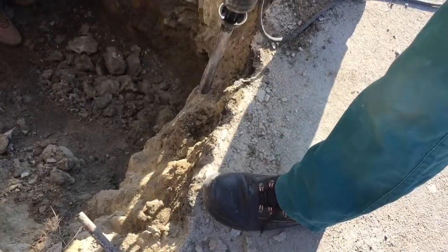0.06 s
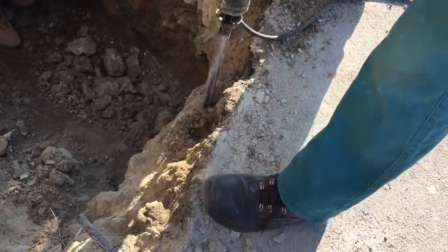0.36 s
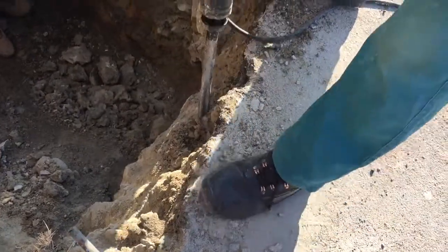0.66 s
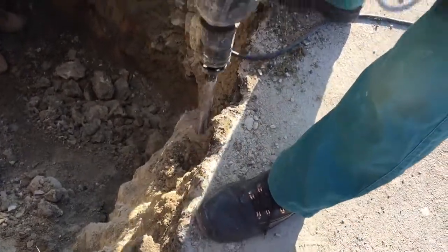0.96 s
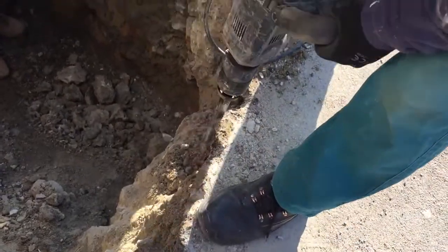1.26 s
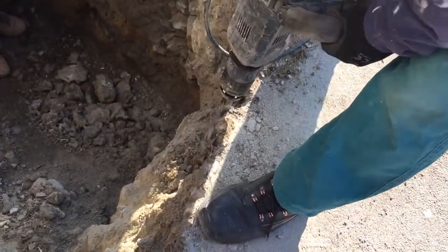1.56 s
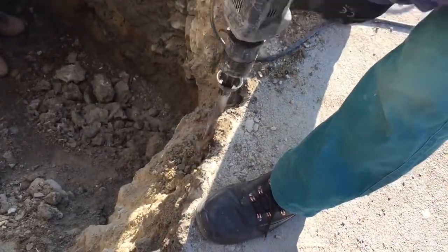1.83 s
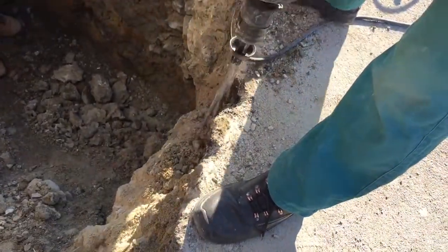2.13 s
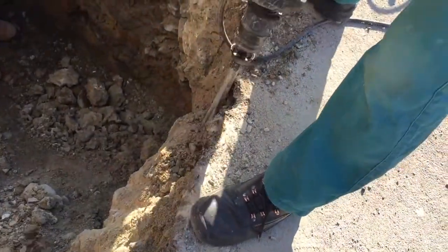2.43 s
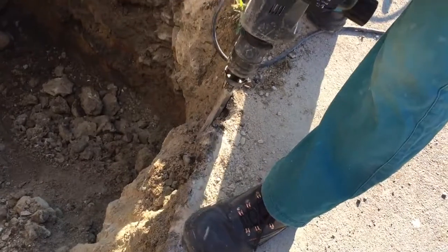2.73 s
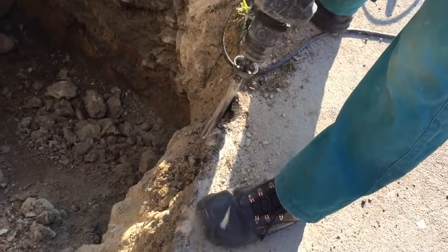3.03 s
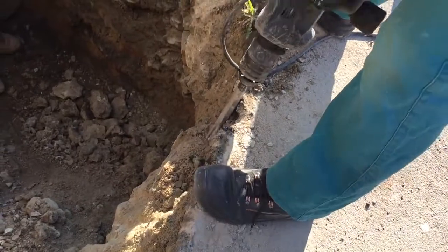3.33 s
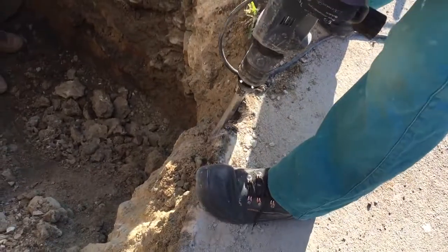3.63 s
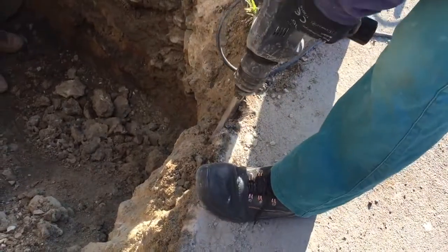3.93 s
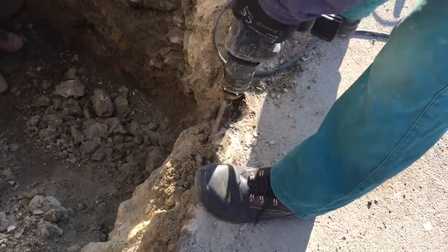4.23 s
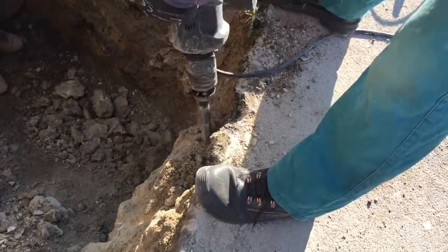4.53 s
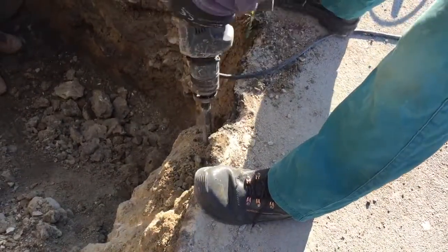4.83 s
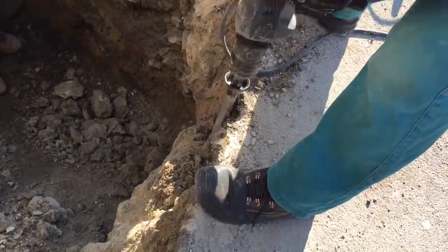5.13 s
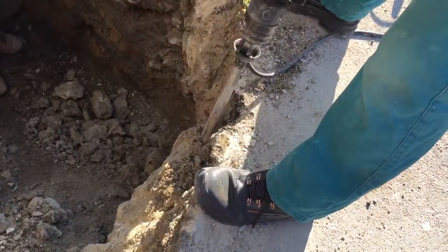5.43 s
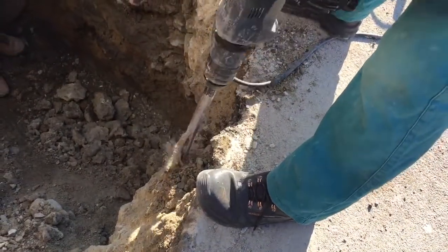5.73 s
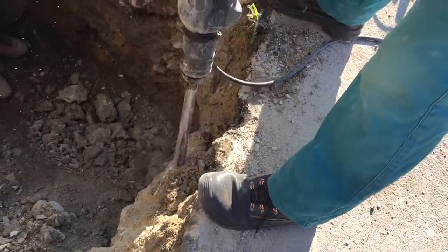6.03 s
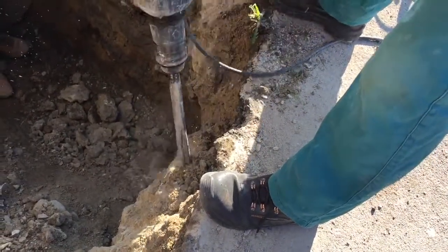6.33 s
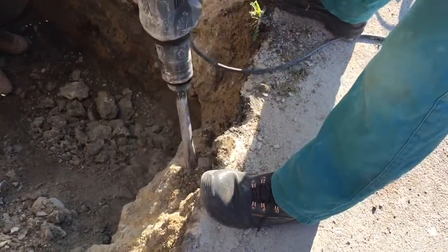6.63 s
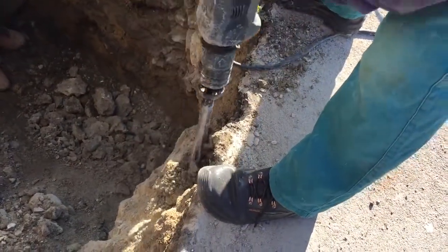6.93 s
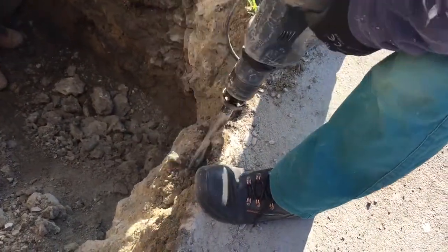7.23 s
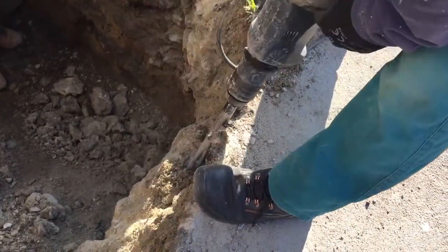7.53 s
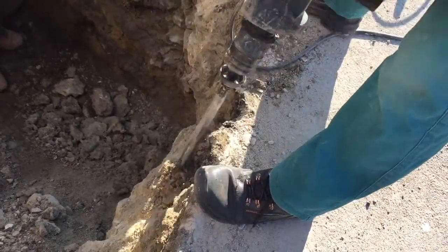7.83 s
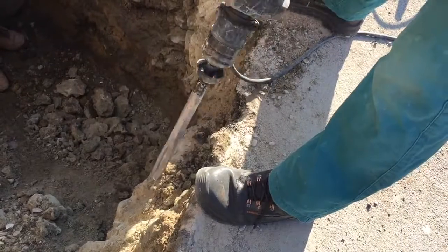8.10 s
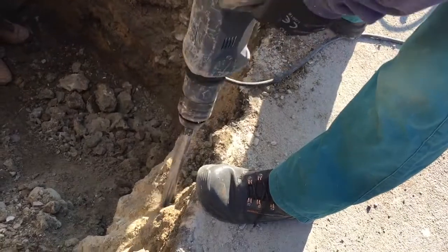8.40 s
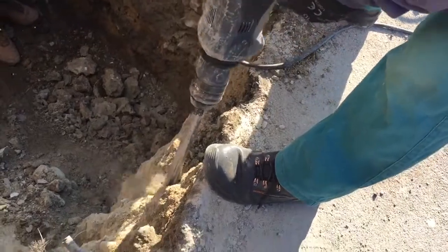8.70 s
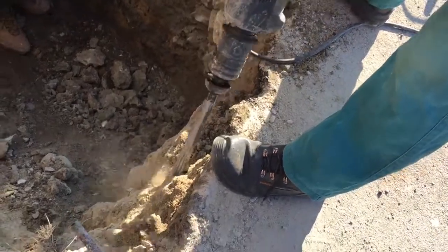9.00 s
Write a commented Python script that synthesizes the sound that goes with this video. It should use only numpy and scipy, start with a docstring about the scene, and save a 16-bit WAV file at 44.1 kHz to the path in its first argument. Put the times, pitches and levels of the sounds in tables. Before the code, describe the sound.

Close rattling bursts of an electric breaker chiselling stony ground, with crunching grit, a surging motor whine and a faint generator hum.

```python
"""An electric breaker chisels at the stony edge of a pit, about a metre from the microphone.
First its motor whines freely while a generator hums further off. From 0.4 s it is pressed down nine
times: the motor sags and the ram strikes some 32 times a second. Each blow cracks on the steel, knocks
the stone and thuds in the ground; then grit crunches and a loose chisel rings on. After each press the
motor surges and begins to settle. The last press runs until the sound ends, just after 9 s."""
import sys
import numpy as np
from scipy import signal
from scipy.fft import rfft, irfft
from scipy.io import wavfile
from scipy.ndimage import uniform_filter1d

SR = 44100
rng = np.random.default_rng(int(sys.argv[2]) if len(sys.argv) > 2 else 0)


def persist_wave(psi):
    """Save psi, clipped to +-1, as 16-bit WAV."""
    counts = np.round(np.clip(psi, -1, 1) * 32767).astype(np.int16)
    wavfile.write(sys.argv[1], SR, np.atleast_2d(counts).T)


N = 403956
T = np.arange(N) / SR


def undb(db):
    """Turn decibels into a factor to multiply by."""
    return 10 ** (np.asarray(db) / 20)


def unit(x):
    """Scale a signal to an average size (rms) of 1."""
    return x / np.sqrt(np.mean(x ** 2))


def curves(table, at):
    """Read a table's columns at the given times, drawing straight lines between its rows."""
    times, *columns = np.transpose(table)
    return [np.interp(at, times, column) for column in columns]


def colour(x, points):
    """Shape the tone with (f/Hz, level/dB) points; white noise keeps its overall level."""
    hz, db = np.transpose(points)
    gain = undb(np.interp(np.log(np.fft.rfftfreq(4096, 1 / SR) + 1), np.log(hz), db))
    # fold the filter so that nothing sounds before its cause
    cepstrum = irfft(np.log(gain))
    half = len(cepstrum) // 2
    cepstrum[1:half] *= 2
    cepstrum[half:] = 0
    response = irfft(np.exp(rfft(cepstrum)))
    return signal.fftconvolve(x, response / np.linalg.norm(response))[:len(x)]


def wander(rate_hz):
    """A smooth random wobble of about size 1."""
    hold = max(int(SR / rate_hz), 1)
    steps = np.repeat(rng.standard_normal(N // hold + 1), hold)
    return unit(uniform_filter1d(steps, hold)[:N])


def last_blow(times):
    """For each sample: which blow came last, and how many seconds ago."""
    latest = np.maximum(np.searchsorted(times, T) - 1, 0)
    return latest, np.where(T > times[0], T - times[latest], 1)


def place(times, db, shapes):
    """Put one sound at each time; db is the level that 32 of them a second would have."""
    out = np.zeros(N + SR)
    for start_s, gain, shape in zip(times, undb(db), shapes):
        i = int(start_s * SR)
        out[i:i + len(shape)] += gain * shape * np.sqrt(SR / 32) / np.linalg.norm(shape)
    return out[:N]


def strike(times, db, tones, lag_s, scatter, uneven_db):
    """A struck thing's tones, a little different each time; each drops 60 dB in its fade time."""
    longest_s = max(fade_s for _, _, fade_s in tones)
    t = np.arange(min(int(SR * longest_s), SR // 4)) / SR
    shapes = 0
    for k, (hz, tone_db, fade_s) in enumerate(tones):
        detune, size = rng.standard_normal((len(times), 2)).T[:, :, None]
        swing = np.sin(2 * np.pi * hz * (1 + scatter * detune) * t)
        fade = np.exp(-np.log(1000) * t / fade_s)
        shapes = shapes + (-1) ** k * undb(tone_db + uneven_db * size) * swing * fade
    return place(times + lag_s, db, shapes)


# how fast the generator fires and how loud it is: t/s, f/Hz, level/dB
GENERATOR_RUN = [(0, 52, -39.5), (.35, 52, -42), (2.1, 53, -48), (2.3, 53, -56), (3.2, 53.5, -47),
                 (4.9, 53.5, -52), (5.6, 53.5, -44.5), (6.1, 53.5, -57), (9.16, 53.5, -56)]
# the tones of its hum: multiple of the firing rate, level/dB
HUM_TONES = [(1, -3), (2, 0.5), (3, -12), (4, -3), (5, -3)]
def generator():
    """A small engine's exhaust hums further off, wavering a little."""
    hz, db = curves(GENERATOR_RUN, T)
    phase = 2 * np.pi * np.cumsum(hz * (1 + 0.0071 * wander(12))) / SR
    tones = (undb(db + tone_db + 2 * wander(9.8)) * np.sin(k * phase) for k, tone_db in HUM_TONES)
    return np.sqrt(2) * sum(tones)


# the tone of the rushing air: f/Hz, level/dB
AIR_TONE = [(30, -19), (140, -10.5), (250, -4), (400, -12.5), (650, -7.5), (930, -2.5), (1180, -7.5),
            (1550, -2), (2400, -13), (4200, -12), (4850, -17.5), (5800, -17.5), (8600, -24.5),
            (16000, -39.5)]
def cooling_air(hammering):
    """Air rushes through the motor, a little quieter while the ram strikes."""
    rush = colour(rng.standard_normal(N), AIR_TONE)
    return rush * undb(-30 - 1.5 * hammering + 0.6 * wander(50))


# the gears' tones: multiple of the shaft speed, free level/dB, loaded level/dB
GEAR_TONES = [(4, -40, -49), (8, -50, -36), (12, -52, -57), (17, -59, -49)]
def gears(angle, load):
    """The gears sing; load changes which of their tones stand out."""
    out = 0
    for k, free_db, loaded_db in GEAR_TONES:
        db = free_db + (loaded_db - free_db) * load + (1.5 + 2 * load) * wander(90)
        out = out + undb(db) * np.sin(k * angle)
    return np.sqrt(2) * out


# how loud the fan is as the tool turns: t/s, level/dB
FAN_LEVEL = [(0, -42.5), (.35, -42.5), (.6, -43), (1.0, -39), (1.5, -41), (1.8, -45), (2.0, -41),
             (2.28, -40), (2.4, -48), (4.25, -43), (4.7, -45.5), (5.0, -38.5), (5.3, -44.5), (5.7, -47.5),
             (7.9, -41.5), (8.1, -41), (9.16, -49)]
# the whine's tones: multiple of the shaft speed, added level/dB, slow wobble/dB
WHINE_TONES = [(8.93, 8, 2.5), (17.9, 1, 3.5), (27, -11, 2), (36, -12, 1), (45, -36, 3)]
def fan_whine(angle, load):
    """The fan's whine follows the shaft speed and gets quieter under load."""
    fan_db, = curves(FAN_LEVEL, T)
    # the piston loads the shaft twice for each turn of the crank, so the whine flutters
    flutter = 1 + .5 * np.sin(2 * angle / TURNS_PER_BLOW + .7 * wander(25))
    waver = undb(1.8 * wander(110))
    tones = sum(undb(fan_db + db + wobble_db * wander(6)) * np.sin(k * angle)
                for k, db, wobble_db in WHINE_TONES)
    return np.sqrt(2) * tones * flutter * waver * undb(-7 * load)


def coast(age, from_hz, surge_hz, free_hz=305.2, rise_s=.07, settle_s=.25):
    """Let go, the motor speeds up too far and its speed control reins it in."""
    settle, rise = (np.exp(-np.maximum(age, 0) / s) for s in (settle_s, rise_s))
    return free_hz + (from_hz - free_hz) * settle + surge_hz * (settle - rise)


def shaft_speed(lean_s=0.0692):
    """Turns a second: leaning on the tool drags the motor down, and it coasts in between."""
    t = T[::100]
    hz = coast(t + .12, from_hz=305.2, surge_hz=80)  # the tool has only just been lifted
    for press, (*_, surge_hz) in zip(PRESSES, PRESS_SPOTS):
        start, end = press[0][0], press[-1][0]
        working_hz = curves(press, t)[0]
        pressed = np.clip(1 + (t - start) / lean_s, 0, 1)
        released_hz = coast(t - end, working_hz[-1], surge_hz)
        hz = np.where(t < end, hz + pressed * (working_hz - hz), released_hz)
    return np.interp(T, t, hz)


def motor(times):
    """One shaft drives the fan and the gears, while cooling air rushes."""
    hz = shaft_speed()
    _, age = last_blow(times)
    hammering = uniform_filter1d(1. * (age < .05), SR // 20)
    load = hammering * np.clip((326 - hz) / 30, 0, 1)  # the harder it works, the slower it turns
    stumble = 0.0108 * load * np.cos(2 * np.pi * 32 * age)  # the shaft trips at each blow and recovers
    jitter = (.0012 + 0.0084 * load) * wander(130)
    angle = 2 * np.pi * np.cumsum(hz * (1 + stumble + jitter)) / SR
    return fan_whine(angle, load) + gears(angle, load) + cooling_air(hammering)


def grit(times, db, crumbs_per_s=5000, fade_s=0.014):
    """Crumbs of stone crunch after each blow."""
    latest, age = last_blow(times)
    crumbs = (rng.random(N) < crumbs_per_s / SR) * rng.standard_normal(N)
    crumbs *= undb(2.7 * rng.exponential(size=N))  # a few are much louder
    crunch = colour(unit(crumbs), [(150, -3.5), (300, 10.0), (450, -6.5), (1000, 1), (1600, -3.5),
                                   (2200, 1.5), (4000, -8.5), (8000, -6.5), (15000, -22)])
    return crunch * undb(db[latest] + 9) * np.exp(-age / fade_s)


# the low tones of ground and housing under a blow: f/Hz, level/dB, fade time/s
GROUND_TONES = [(69.2, -7, 0.14), (134.8, -3, 0.13), (211, -1, 0.09), (272.3, 2.5, 0.086)]
# the tip sinks in and a clod of earth gives way: t/s, level/dB
CLOD_THUDS = [(.977, -23), (1.009, -24), (2.836, -28), (5.944, -27), (6.350, -22), (7.275, -28),
              (8.633, -23.5)]
def ground(times, boom_db, thud_db, uneven):
    """The ground booms and thuds at every blow, with a heavy thud when a clod gives way."""
    boom = strike(times, boom_db, GROUND_TONES[:1], lag_s=0.0012, scatter=.015, uneven_db=1)
    thud = strike(times, thud_db, GROUND_TONES[1:],
                  lag_s=0.0018, scatter=.015 * uneven, uneven_db=2.5 * uneven)
    clods = strike(*np.transpose(CLOD_THUDS), GROUND_TONES[2:], lag_s=0.0029, scatter=.06, uneven_db=2.5)
    return boom - thud + clods


# the stone's tones: f/Hz, level/dB, fade time/s
STONE_TONES = [(384, -16.5, 0.07), (545.5, -3, 0.086), (637, 2.5, 0.039), (747, -1, 0.016)]
def stone_knock(times, db, uneven):
    """The stone gives a short knock as the tip bites."""
    return undb(-1) * strike(times, db, STONE_TONES,
                             lag_s=0.00086, scatter=0.019 * uneven, uneven_db=3.4 * uneven)


# the tones of the tool's housing: f/Hz, level/dB, fade time/s
HOUSING_TONES = [(1562, -1, 0.086), (2910, 3.5, 0.034), (3104, -10, 0.029), (4630, 0, 0.031),
                 (5230, -3.5, 0.083), (6700, 5, 0.02), (6940, 14.5, 0.015), (8650, 3.5, 0.03)]
def housing_clank(times, db, uneven):
    """The housing clanks when the chisel sits hard on the stone."""
    return undb(2) * strike(times, db, HOUSING_TONES,
                            lag_s=0.001103, scatter=0.015 * uneven, uneven_db=4.64 * uneven)


# glancing hits on the chisel's shank, its long stem: t/s, level/dB
GLANCES = [(2.393, -33), (2.425, -27), (2.457, -29.5), (6.280, -23), (6.314, -25), (6.625, -29),
           (6.689, -30), (8.758, -29), (8.951, -28), (8.984, -23)]
# the tones of the bending shank: f/Hz, level/dB, fade time/s
SHANK_TONES = [(1900, 4, .05), (3750, -3, 0.13), (3670, 1, 0.093), (5360, -7, .06)]
def shank_clangs():
    """The shank glances off stone, bends to and fro, and clangs."""
    return strike(*np.transpose(GLANCES), SHANK_TONES, lag_s=.0005, scatter=.006, uneven_db=2)


# the tip breaks through: t/s, level/dB, wait for the second clack/s
BREAKTHROUGHS = [(0.477, -26.5, 0.0052), (1.875, -28, 0.0052), (2.522, -21.5, 0.0059), (2.904, -24, .005),
                 (5.943, -28, 0.007), (6.383, -28, 0.0082), (8.632, -26, 0.006)]
def striker_clacks(ring_s=0.0016, second_db=-3):
    """The steel striker hits its catcher twice, with two bright, dry clicks."""
    t = np.arange(SR // 30) / SR
    times, db, gaps = np.transpose(BREAKTHROUGHS)
    late = t - gaps[:, None]
    envelope = np.exp(-t / ring_s) + undb(second_db) * (late > 0) * np.exp(-np.abs(late) / ring_s)
    clicks = place(times, db, envelope * rng.standard_normal(envelope.shape))
    return colour(clicks, [(1000, -16), (4500, -21), (8500, 11), (12000, 11), (15500, -27)])


# the chisel's tones: f/Hz, level/dB, fade time when loose/s, jolt per blow/rad, share of the swell in dB
CHISEL_TONES = [(3645, -14, .07, 2.5, .9), (5790, -8, .07, 2.5, .9), (6914, 1.3, .19, 1.2, 1),
                (8274, -7, .045, 2.5, .7), (11090, -14, .04, 2.5, .7), (13346, -6, .075, 1.7, .5),
                (14160, -11, .05, 2.5, .7)]
def chisel_ring(times, db, full_db=-20, grip_db=-31, gripped=0.035, stop_s=0.035):
    """The steel bar rings on between blows; gripped by the soil it is quieter and dies faster."""
    latest, age = last_blow(times)
    looseness = np.clip(gripped + (1 - gripped) / (1 + np.exp((grip_db - db) / 3)), .05, 1)[latest]
    ring = 0
    for hz, tone_db, fade_s, jolt, share in CHISEL_TONES:
        phase = np.cumsum(jolt * rng.standard_normal(len(times)))[latest]  # each blow jolts the ring
        uneven_db = 1.8 * rng.standard_normal(len(times))
        size_db = full_db + share * (db - full_db) + tone_db + uneven_db
        fade = np.exp(-np.log(1000) * age / (fade_s * looseness))
        ring = ring + undb(size_db)[latest] * fade * np.sin(2 * np.pi * hz * T + phase)
    rise = 1 - np.exp(-age / 0.0011)
    settle = np.exp(-np.maximum(age - stop_s, 0) / 0.0056)  # with no new blow, it rests on the ground
    return undb(6.5) * ring * rise * settle


# the tone of the crack: f/Hz, level/dB
CRACK_TONE = [(400, -26), (800, -1), (1600, 2.5), (2100, -3), (2900, -1), (3700, -0.5), (4400, 3.5),
              (4900, -10.5), (6000, 3.5), (6900, 1.5), (7600, -3), (10300, -17), (13300, -6.5),
              (15800, -22)]
def steel_crack(times, db, snap_s=0.00069, peak_s=0.0018, tail_db=-13, tail_s=0.017, alike=0.033):
    """Steel hits steel: a short snap and a rattling tail, slightly alike from blow to blow."""
    t = np.arange(SR // 20) / SR
    shared = np.sqrt(alike) * rng.standard_normal(len(t))
    fresh = np.sqrt(1 - alike) * rng.standard_normal((len(times), len(t)))
    snap = np.exp(-((t - peak_s) / snap_s) ** 2)
    rattle = undb(tail_db) * np.exp(-(t / tail_s) ** 2)
    uneven_db = 1.3 * rng.standard_normal(len(times))
    cracks = place(times, db + uneven_db, (shared + fresh) * (snap + rattle))
    return undb(7) * colour(cracks, CRACK_TONE)


TURNS_PER_BLOW = 9.33
def blow_times(press):
    """The crank throws the ram once in so many shaft turns, so the blows slow down with the motor."""
    t = np.linspace(press[0][0], press[-1][0], SR // 10)
    turns = np.cumsum(curves(press, t)[0]) * (t[1] - t[0])
    count = round(turns[-1] / TURNS_PER_BLOW) + 1
    return np.interp(np.linspace(turns[0], turns[-1], count), turns, t)


# one list per press, from first blow to last: t/s, shaft f/Hz, force level/dB, ring level/dB
PRESSES = [
    [(0.381, 308.3, -31, -14.5), (0.412, 298.5, -30.5, -30), (0.444, 285, -28.5, -38),
     (0.477, 287, -31.5, -40)],
    [(0.54, 296.4, -40.5, -31.5), (0.664, 299.7, -28.5, -19.5), (0.789, 295.7, -37.5, -22.5),
     (0.85, 306.7, -34.5, -29.5), (1.008, 282, -27, -31), (1.105, 292.4, -33.5, -32),
     (1.137, 292.5, -30.5, -34), (1.503, 315.4, -33.5, -55), (1.717, 293.6, -29, -41),
     (1.873, 301, -33.5, -33)],
    [(2.359, 306, -45, -43), (2.391, 301.7, -37, -29.5), (2.489, 295.4, -30.5, -31), (2.521, 287, -30, -37)],
    [(2.676, 318.7, -45, -32.5), (2.736, 307.2, -31, -29), (2.834, 273, -30.5, -37),
     (2.903, 287.7, -31, -33)],
    [(3.371, 314.8, -38.5, -30), (3.496, 279.6, -30, -32), (3.628, 296, -32.5, -35),
     (3.852, 286.1, -30.5, -35), (3.976, 312.5, -34, -39), (4.071, 289.4, -33, -43),
     (4.165, 299.2, -32, -29.5), (4.55, 297.7, -32.5, -34), (4.63, 320.7, -39.5, -41),
     (4.749, 329.3, -46.5, -48)],
    [(5.776, 297.3, -39.5, -20.5), (5.842, 290.6, -32.5, -22.5), (5.875, 290.6, -29, -13.5),
     (5.942, 286.3, -32, -23)],
    [(6.185, 308, -31, -11), (6.247, 291, -28, -17.5), (6.281, 278.6, -27, -16), (6.314, 278.4, -32, -14.5),
     (6.347, 280.6, -30.5, -47), (6.382, 285.5, -31.5, -46)],
    [(6.444, 311.4, -44, -34), (6.502, 324.7, -35.5, -27), (6.625, 292, -28, -19),
     (6.975, 296.7, -29.5, -28), (7.096, 331.2, -36.5, -34), (7.182, 327, -28.5, -30),
     (7.211, 311.4, -24, -21), (7.306, 285, -30.5, -29), (7.46, 326.5, -31, -31), (7.613, 284.8, -26, -30),
     (7.711, 294, -29, -31), (7.802, 317, -34, -30)],
    [(8.497, 306, -31, -17.5), (8.595, 262.8, -30, -14.5), (8.667, 284.7, -33, -29),
     (8.697, 305, -31.5, -20.5), (8.886, 286.4, -28, -20), (8.918, 286.7, -28.5, -25.5),
     (8.983, 287.6, -27.5, -17.5), (9.145, 289.3, -33, -21.5)],
]
# how each press's spot answers a firm blow, and the motor's surge on letting go:
# thud level/dB, boom level/dB, knock level/dB, clank level/dB, grit level/dB, surge f/Hz
PRESS_SPOTS = [(-32, -38, -38, -41, -31.5, 20), (-28, -39.5, -30.5, -30, -30.5, 68),
               (-31, -43, -34, -30.5, -31, 25), (-27.5, -37, -31.5, -32, -30.5, 70),
               (-25.5, -36, -30.5, -31.5, -28.5, 26.5), (-28, -44, -31, -31, -26, 47.5),
               (-28.5, -44, -32, -40, -33, 45), (-29, -42, -34, -33, -31.5, 48.5),
               (-29, -45, -36, -33.5, -29.5, 39)]
def ram_blows(firm_db=-30, soil_share=0.87, seated_ring_db=-29, seated_share=.15):
    """Each blow's time, and how hard it drives the crack, thud, boom, knock, clank, grit and ring."""
    rows = []
    for press, (thud_db, boom_db, knock_db, clank_db, grit_db, _) in zip(PRESSES, PRESS_SPOTS):
        times = blow_times(press)
        _, force_db, ring_db = curves(press, times)
        push_db = force_db - firm_db
        soil_db = soil_share * push_db
        # the less the chisel rings, the more of the blow goes into the stone
        stone_db = soil_db + seated_share * (seated_ring_db - ring_db)
        rows.append([times, force_db, thud_db + soil_db, boom_db + soil_db, knock_db + stone_db,
                     clank_db + stone_db, grit_db + push_db, ring_db])
    return np.hstack(rows)


def scene():
    """The blows, the motor and the generator, heard in the open air."""
    times, crack_db, thud_db, boom_db, knock_db, clank_db, grit_db, ring_db = ram_blows()
    # a firmly seated chisel strikes more evenly; a loose one dances
    uneven = np.interp(ring_db, [-36, -26], [.4, 1])[:, None]
    steel = steel_crack(times, crack_db) + chisel_ring(times, ring_db) + striker_clacks()
    body = shank_clangs() + housing_clank(times, clank_db, uneven)
    earth = ground(times, boom_db, thud_db, uneven)
    stone = stone_knock(times, knock_db, uneven) + grit(times, grit_db)
    return (steel + body + earth + stone + motor(times) + generator())[None]


def record(dry, bass_hz=45, top_hz=15600):
    """The sound loses its deepest bass, its peaks are rounded and its highest treble is cut."""
    thin = signal.sosfilt(signal.butter(3, bass_hz, "highpass", fs=SR, output="sos"), dry)
    rounded = .8 * np.tanh(thin / .8)
    return signal.sosfilt(signal.ellip(8, .2, 70, top_hz, fs=SR, output="sos"), rounded)


dry = scene()
out = record(dry)
persist_wave(out)
```